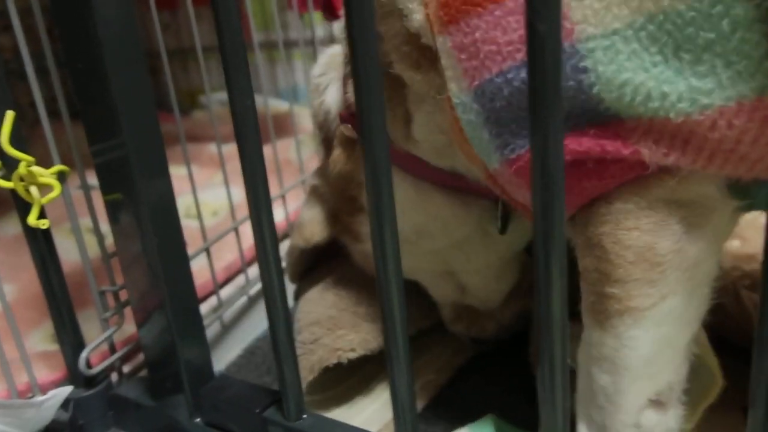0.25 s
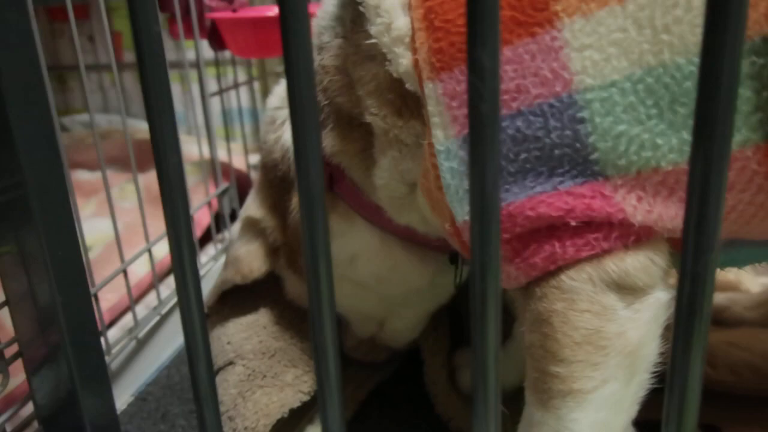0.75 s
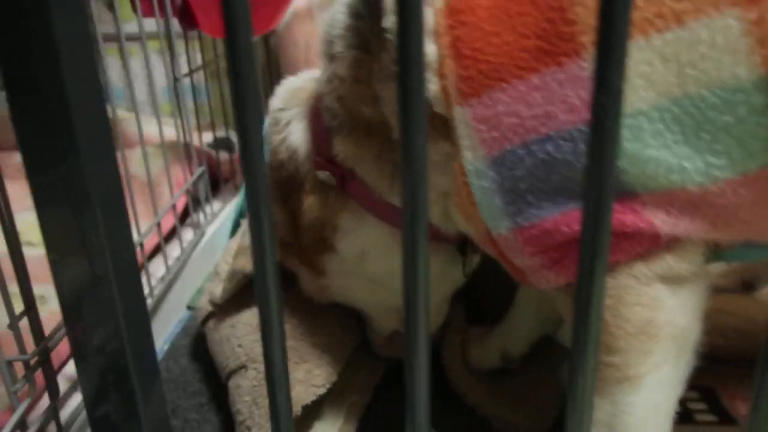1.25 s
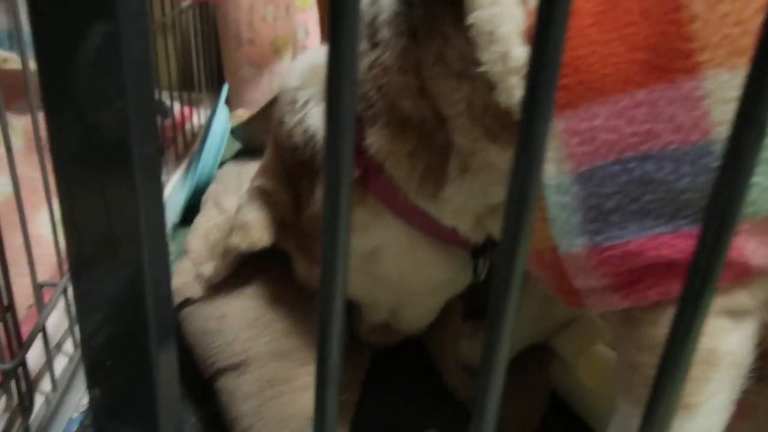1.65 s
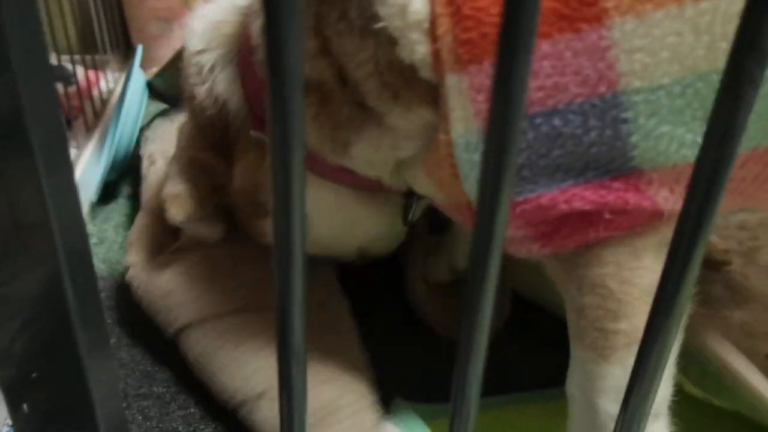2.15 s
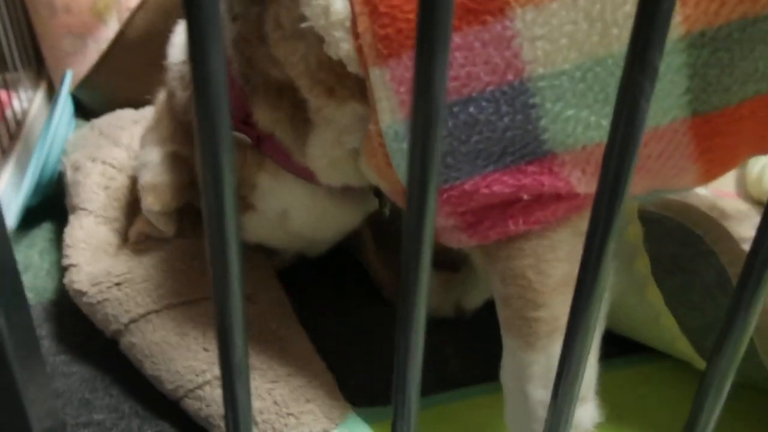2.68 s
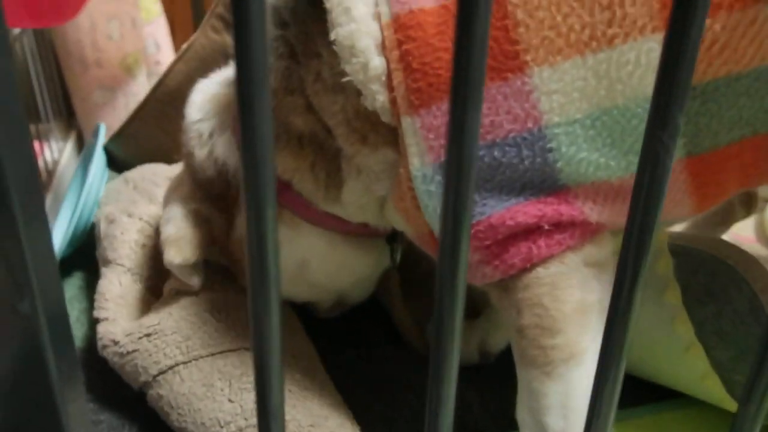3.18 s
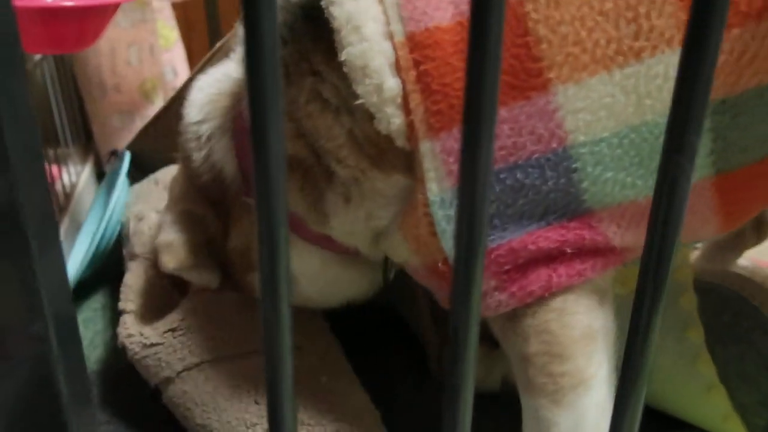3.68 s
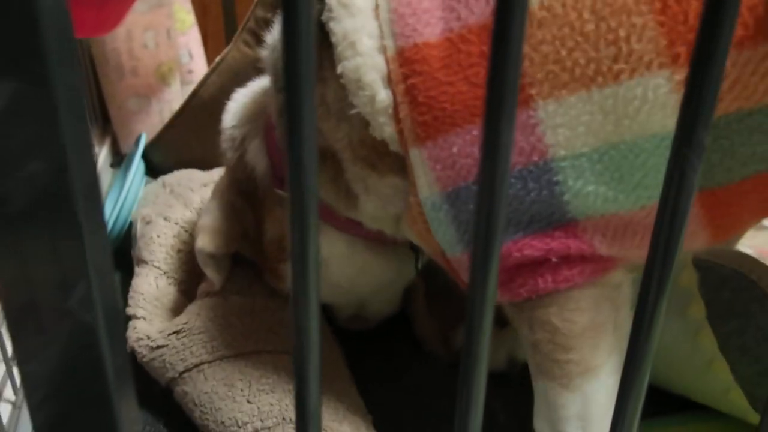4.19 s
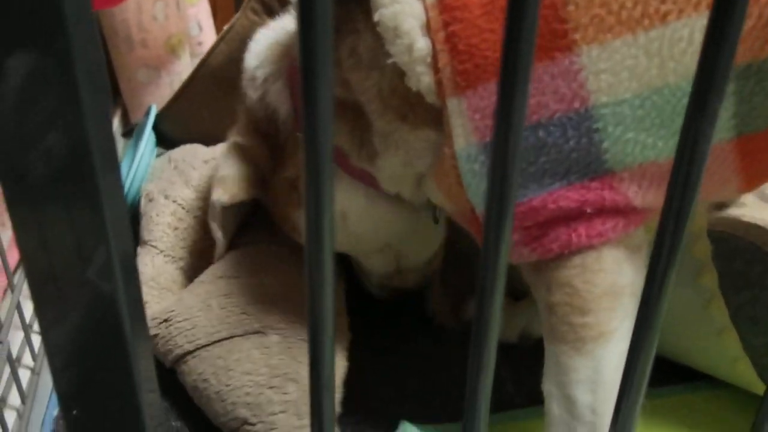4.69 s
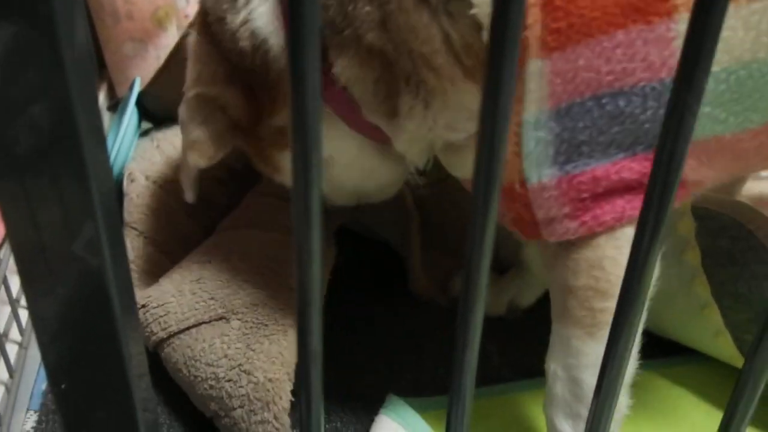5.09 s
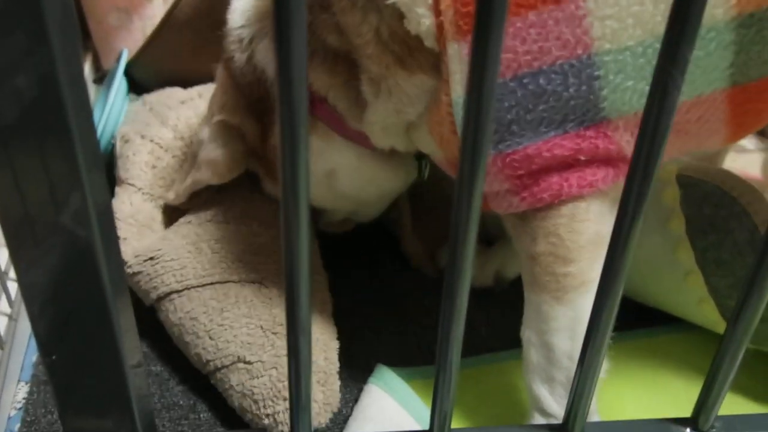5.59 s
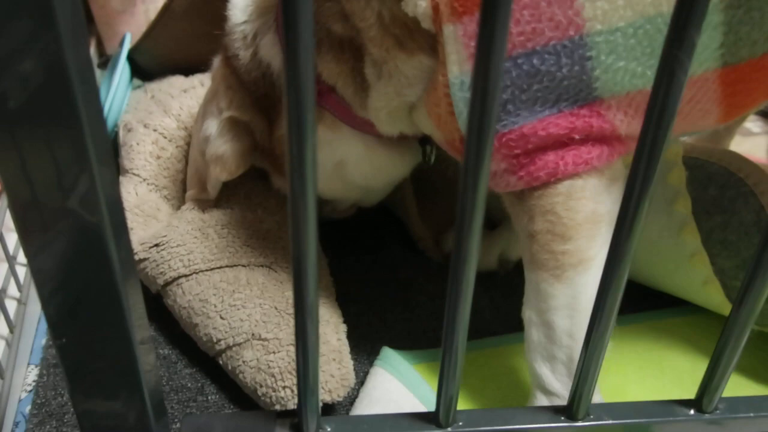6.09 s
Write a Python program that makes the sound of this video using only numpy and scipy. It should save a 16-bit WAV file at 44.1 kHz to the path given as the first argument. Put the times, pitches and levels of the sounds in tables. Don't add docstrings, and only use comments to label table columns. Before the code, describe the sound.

Close stereo pickup of a dog rummaging in fleece in a quiet humming room. Soft paw thuds and two snorts come first, then digging drags cloth in rough strokes while plastic creaks rapidly. A hard knock ends it; small sniffs, squeaky chirrs and ticks follow, then the biggest snort, a short groaning slide and faint scuffs.

```python
import sys
import numpy as np
from scipy import signal
from scipy.fft import rfft, irfft, next_fast_len
from scipy.io import wavfile

SR = 44100
rng = np.random.default_rng(int(sys.argv[2]) if len(sys.argv) > 2 else 0)


def int16_out(signal):
    q = np.round(np.clip(np.atleast_2d(signal).T, -1, 1) * 32767)
    wavfile.write(sys.argv[1], SR, q.astype(np.int16))


def boost(x):
    u = np.asarray(x, float) / 20
    return 10 ** u


N = 279798


def in_time(rows):
    s, *columns = np.transpose(rows)
    return [np.interp(np.arange(N) / SR, s, column) for column in columns]


def rms_one(x):
    return x / np.sqrt(np.mean(x ** 2) + 1e-20)


def mid_only(x):
    return np.array([x, np.zeros(N)])


def low_pass(x, order, hz):
    return signal.sosfilt(signal.butter(order, hz, fs=SR, output="sos"), x)


def coloured(spectrum):
    hz, db = np.transpose(spectrum)
    size = next_fast_len(N)
    bins_hz = np.arange(size // 2 + 1) * SR / size + 1
    gain = boost(np.interp(np.log(bins_hz), np.log(hz), db))
    return rms_one(irfft(rfft(rng.standard_normal(size)) * gain, size)[:N])


def drift(rate_hz):
    return coloured([(rate_hz / 10, 0), (rate_hz, 0), (rate_hz * 10, -40), (SR, -160)])


def resonance(x, hz, width_hz):
    r = np.exp(-np.pi * width_hz / SR)
    poles = [1, -2 * r * np.cos(2 * np.pi * hz / SR), r * r]
    return signal.lfilter([(1 - r * r) / 2, 0, (r * r - 1) / 2], poles, x + 1e-18)


def narrow(x, hz, width_hz):
    return resonance(resonance(x, hz, width_hz), hz, width_hz)


def band(hz, width_hz):
    return rms_one(narrow(rng.standard_normal(N), hz, width_hz))


def ring(clicks, hz, t60):
    r, w = boost(-60 / (t60 * SR)), 2 * np.pi * hz / SR
    return signal.lfilter([0, np.sin(w)], [1, -2 * r * np.cos(w), r * r], clicks + 1e-18)


def leaning(hz, k):
    return 1 if hz < 1500 else (-1) ** k


def strike(events, modes, bright_hz, scatter_db, smear_s):
    s, peak_db, bright_db, apart_db = np.transpose(events)
    out = np.zeros((2, N))
    luck = rng.random((len(s), len(modes), 3))
    for k, (hz, t60, mid_db, side_db) in enumerate(modes):
        late, strength, sign = luck[:, k].T
        db = peak_db + scatter_db * (2 * strength - 1) + bright_db * (hz > bright_hz)
        shares = boost(np.array([mid_db + 0 * s, side_db + apart_db])) * [[1], [leaning(hz, k)]]
        clicks = np.zeros((2, N))
        clicks[:, ((s + smear_s * late) * SR).astype(int)] = boost(db) * np.sign(sign - 0.5) * shares
        out += resonance(ring(clicks, hz, t60), hz, 40 / t60)
    return out


def swells(rows, curve):
    out = np.full(N, 1e-9)
    for peak, rise, fall, db in rows:
        i = np.arange(max(int((peak - 2 * rise) * SR), 0), min(int((peak + 2 * fall) * SR), N))
        away = i / SR - peak
        distance = np.where(away < 0, -away / rise, away / fall)
        out[i] += boost(db - 30 * distance ** curve)
    return out


# freq_hz, density_db (per Hz)
FLOOR_MID = [(44, -27), (75, -9), (92, -14.5), (123, -6.5), (273, -39), (667, -23), (798, -8.5), (872, -29),
             (954, -24), (1090, -29), (1270, -28), (7940, -47), (15500, -60)]
FLOOR_SIDE = [(35, -54), (60, -25), (132, -6.5), (443, -6.5), (738, -15), (810, -11), (2010, -15.5),
              (3840, -21), (12300, -35), (15500, -45)]
# freq_hz, level_db
HUM = [(60, -40.5), (120, -59.5)]
# freq_hz, width_hz, level_db
FAN = [(54.3, 31, -54), (799.3, 22.7, -56)]


def room():
    t = np.arange(N) / SR
    mid = boost(-50) * coloured(FLOOR_MID)
    for hz, db in HUM:
        mid += boost(db + 0.67 * drift(0.64)) * np.sqrt(2) * np.sin(2 * np.pi * hz * t)
    for hz, width, db in FAN:
        mid += boost(db + 2.5 * drift(3.7)) * band(hz, width)
    return np.array([mid, boost(-52.5) * coloured(FLOOR_SIDE)])


# time_s, rumble_db
STIR = [(0.0, -47), (0.48, -57.5), (1.06, -44), (1.39, -54), (1.84, -45), (2.45, -51), (2.67, -43),
        (2.9, -68), (3.14, -68), (3.3, -57), (4.04, -47.5), (4.6, -49.5), (4.91, -56), (5.26, -50.5),
        (5.42, -41), (5.6, -58), (6.0, -56.5), (6.34, -48.5)]


def stir():
    rumble_db, = in_time(STIR)
    return mid_only(boost(rumble_db - 0.5 + 2.8 * drift(5.8)) * band(154.6, 55))


# peak_s, rise_and_fall_s, level_db
SCUFFS = [(0.5, 0.46, -53), (0.74, 0.35, -41), (1.3, 0.53, -48.5), (1.65, 0.4, -56), (1.84, 0.75, -46),
          (2.5, 0.31, -49.5), (2.679, 0.23, -37), (3.0, 0.31, -42.5), (3.3, 0.54, -55), (3.74, 1, -54.5),
          (4.55, 0.36, -45.5), (4.88, 0.043, -53), (5.14, 0.22, -51), (5.5, 0.79, -61), (6.2, 0.32, -55)]


def scuffs():
    level = boost(-57.5) + swells([(s, half, half, db) for s, half, db in SCUFFS], 0.67)
    return mid_only(level * boost(1.5 * drift(21)) * band(278, 422))


# start_s, peak_db, brightness_db
TICKS = [(0.167, -46, -10.5), (0.642, -40, -17), (0.702, -42, -13), (0.786, -39.5, 0.5), (0.937, -39.5, -9),
         (0.9693, -48, -6.5), (1.039, -41, -10.5), (1.101, -46.5, -5), (1.937, -32, -12.5),
         (2.4307, -34.5, -9), (2.967, -48, -12), (3.8378, -42, -15), (3.908, -45.5, -15),
         (3.9712, -38.5, -16), (4.141, -44, -16), (4.239, -43, -13), (4.341, -39, -13),
         (5.1339, -35.5, -11), (5.2066, -50, -17), (5.405, -45.5, -7), (5.5391, -39, -13),
         (6.137, -40.5, -18), (6.336, -47, -15)]
# freq_hz, t60_s, mid_db, side_db
TICK_MODES = [(2370, 0.018, 3.5, -5.5), (3180, 0.0085, 10, 4), (3900, 0.0032, 14.5, 14),
              (5060, 0.011, 2, 10), (6020, 0.0075, 2, -11), (7450, 0.0049, -21, -1),
              (11000, 0.0091, -3, -15)]


def ticks():
    return strike([(*tick, 0) for tick in TICKS], TICK_MODES, bright_hz=2900, scatter_db=4.5, smear_s=0.003)


# start_s, peak_db
SNAPS = [
    (3.293, -44.5),
    (4.756, -60),
    (4.97, -55),
]
# freq_hz, t60_s, mid_db, side_db
SNAP_MODES = [(6000, 0.004, -7, -12), (10300, 0.0041, 1.5, -5), (12100, 0.004, 0, -4),
              (14500, 0.004, -8, -3)]


def snaps():
    return strike([(*snap, 0, 0) for snap in SNAPS], SNAP_MODES, bright_hz=SR, scatter_db=6, smear_s=0.0015)


# start_s, peak_db, length_s, side_db
CHIRRS = [(0.71, -42, 0.012, -3), (0.868, -52.5, 0.017, 6), (0.902, -48, 0.016, 1),
          (1.1097, -39.5, 0.011, -3), (3.01, -43, 0.0098, -3), (3.056, -51, 0.014, -5),
          (3.132, -50, 0.03, -11), (3.083, -58, 0.03, -8), (3.161, -57, 0.025, -8), (3.232, -57, 0.045, -5),
          (3.7421, -42, 0.015, 0), (3.752, -40, 0.015, 2), (3.846, -45.5, 0.011, 0), (3.98, -42, 0.0079, 0),
          (3.9883, -42, 0.011, 3), (4.17, -51, 0.02, -14), (4.258, -57, 0.014, -8),
          (5.413, -42.5, 0.0094, -1), (5.547, -44.5, 0.0096, 2), (6.174, -50, 0.015, 1)]
# freq_hz, width_hz, level_db
CHIRR_MODES = [(1775, 142, 8.5), (2490, 260, -2.5), (3440, 540, -11.5), (4280, 200, -17)]


def chirrs():
    slips = np.zeros((2, N))
    for s, peak_db, length, side_db in CHIRRS:
        length = max(length, 0.004)
        u = np.arange(int(length * SR)) / (length * SR)
        burst = np.sqrt(1 - u) * rng.standard_normal((2, len(u))) * [[1], [boost(side_db)]]
        slips[:, int(s * SR):int(s * SR) + len(u)] += boost(peak_db + 16.5) * burst
    return sum(boost(db - 1.5) * narrow(slips, hz, 1.13 * width) for hz, width, db in CHIRR_MODES)


# start_s, length_s, level_db, from_hz, to_hz
SLIDES = [
    (4.855, 0.065, -42, 620, 298.5),
]


def slides():
    out = np.zeros(N)
    for s, length, db, from_hz, to_hz in SLIDES:
        u = np.arange(int(length * SR)) / (length * SR)
        rough = drift(60)[:len(u)]
        hz = from_hz * (to_hz / from_hz) ** u * (1 + 0.068 * rough)
        tone = np.sin(2 * np.pi * np.cumsum(hz) / SR)
        out[int(s * SR):int(s * SR) + len(u)] += boost(db + 2.9 * rough) * np.sin(np.pi * u) * tone
    return mid_only(out)


# start_s, peak_db, brightness_db, side_share_db
CREAKS = [(0.787, -29, -34, -4), (1.535, -31, -12.5, 5), (1.545, -34, -27, 6), (1.731, -39, -9, 9),
          (1.7444, -39, -3, 2), (1.7489, -15.5, -9.5, 5.5), (1.7595, -35, -20, 5), (1.767, -47, -10, 3),
          (1.772, -38, -8, 3), (1.7775, -20.5, -15, 5), (1.786, -38, -14, 3), (1.809, -40, -10, 6),
          (1.816, -45, -3, 3), (1.829, -24, -16.5, 5.5), (1.858, -36, -13, 2), (1.889, -27.5, -17, 2),
          (1.955, -33, -20, -6), (1.973, -30.5, -17.5, 5), (2.101, -39, -12, -4), (2.1235, -19.5, -15, 4),
          (2.135, -18, -19, -1), (2.148, -18.5, -16, 4), (2.194, -34.5, -8, -1), (2.203, -23.5, -12.5, 3),
          (2.213, -33, -6, 2), (2.231, -23, -12.5, 0), (2.256, -22, -15, 6), (2.266, -29, -18, 3),
          (2.275, -33, -13, 10), (2.281, -15.5, -15.5, 0), (2.289, -38, -16, 2), (2.3008, -14.5, -17.5, 6),
          (2.3142, -15.5, -13.5, 13), (2.32, -13.5, -11, -2), (2.3276, -16, -21, 10), (2.335, -23, -13, -3),
          (2.342, -17, -13, -6), (2.350, -26, -8.5, 7), (2.467, -35, -5.5, 3), (2.494, -44, -9, 7)]
# freq_hz, t60_s, mid_db, side_db
CASING_MODES = [(444, 0.04, -0.5, -14), (740, 0.095, -9.5, -29), (1100, 0.025, 0, -8),
                (1380, 0.0056, -25, 17.5), (1800, 0.026, 6, -1), (2450, 0.011, 5.5, -6),
                (3260, 0.0028, 2.5, 17), (4480, 0.012, -12, -5), (5350, 0.018, -16, -21),
                (6840, 0.006, 1.5, -15), (7600, 0.0045, -40, -7), (10800, 0.0044, -8, -8),
                (11760, 0.022, -13.5, -15), (13900, 0.0034, -31, -14)]


def creaks():
    return strike(CREAKS, CASING_MODES, bright_hz=1300, scatter_db=-0.5, smear_s=0.0008)


def creep_db():
    marks = np.zeros(N)
    marks[[int(s * SR) for s, *rest in CREAKS]] = 1
    half_s = 0.0053
    bumps = signal.fftconvolve(marks, np.hanning(int(2 * half_s * SR)), "same")
    return 4 * np.minimum(bumps, 1)


# peak_s, rise_s, fall_s, level_db, paw_weight_db (over the level)
DRAG = [(0.09, 0.32, 0.17, -59, 8.5), (0.615, 0.026, 0.12, -51.5, -2), (0.72, 0.083, 0.18, -62.5, -2),
        (0.85, 0.14, 0.73, -67.5, 13), (0.98, 0.35, 0.16, -69, 7.5), (1.55, 0.13, 0.027, -59, 7),
        (1.71, 0.27, 0.11, -64.5, 1), (1.769, 0.087, 0.083, -49.5, 6), (1.87, 0.16, 0.22, -58, -3),
        (1.98, 0.17, 0.19, -62, 8), (2.147, 0.077, 0.033, -45.5, 7), (2.209, 0.045, 0.2, -54.5, 14),
        (2.336, 0.15, 0.042, -48, 11.5), (2.4, 0.19, 0.12, -56.5, 6.5), (2.5, 0.1, 0.17, -50, 0.5),
        (2.67, 0.35, 0.18, -45.5, 1.5), (2.767, 0.21, 0.049, -47.5, 11.5), (2.904, 0.0066, 0.036, -50, 12),
        (3.01, 0.064, 0.055, -54.5, 2.5), (3.05, 0.026, 0.025, -61, 7), (3.15, 0.092, 0.077, -56.5, 2.5),
        (3.275, 0.078, 0.049, -61.5, -5), (3.752, 0.047, 0.12, -60, 6.5), (3.83, 0.13, 0.14, -65, 10),
        (4.17, 0.19, 0.19, -60.5, 7), (4.35, 0.16, 0.09, -59.5, -2)]
# freq_hz, width_hz, mid_db, side_db
CLOTH = [(418, 92, -1.5, 0.5), (677, 310, 2, -7), (816, 180, -6.5, -6), (1260, 244, 0.5, -5.5),
         (1635, 306, -0.5, 6), (2330, 670, -8, 3.5), (2780, 580, 1.5, -29), (3400, 810, -84, 6.5),
         (3970, 1500, 0.5, -13), (5360, 4000, -2.5, -0.5), (6900, 1000, -8, -13), (8650, 1400, -5, -9),
         (10600, 460, -51, -17), (12300, 1100, -46, -4), (13600, 1800, -38, -29)]
# time_s, side_share_db, brightness_db
GRIP = [(0, -13, -1), (0.8, 0.5, -7), (1.75, 1.5, 0.5), (2.0, 0, -7), (2.3, 3.5, 6), (2.6, -4, -1.5),
        (3.0, 0, -4), (3.05, 5, 2.5), (3.12, 0.1, -13), (3.28, -1, -5), (3.8, -15, 1.5), (4.3, -12, -12)]


def drag():
    curve = 1.2
    level = swells([row[:4] for row in DRAG], curve)
    weight = swells([(s, rise, fall, db + over_db) for s, rise, fall, db, over_db in DRAG], curve)
    side, bright = boost(np.array(in_time(GRIP)))
    caught = rng.random(N) < 8000 * boost(1.5 * drift(70)) / SR
    strength = boost(2.94 * np.minimum(rng.exponential(1, N), 4))
    catches = caught * strength * rng.choice([-1, 1], N)
    slide = np.cumsum(1 + 0.038 * drift(5))
    out = np.zeros((2, N))
    for k, (hz, width, mid_db, side_db) in enumerate(CLOTH):
        rubbed = narrow(catches, hz, width)
        high = level
        if hz > 2300:
            rubbed = np.interp(slide * (N - 1) / slide[-1], np.arange(N), rubbed)
            high = level * bright
        rubbed = rms_one(rubbed) * boost(2 * drift(16.7))
        out[0] += rubbed * boost(mid_db) * (weight if hz < 1000 else high)
        out[1] += rubbed * boost(side_db) * side * high * leaning(hz, k)
    out[0] = low_pass(out[0], 4, 7700) + boost(-9.5) * out[0]
    return out * boost(creep_db() + np.clip(0.53 * drift(60), -3, 3))


# start_s, peak_db, pitch_hz, t60_s, crack_db
THUDS = [(0.026, -23, 304, 0.031, -23), (0.04, -20.5, 325, 0.013, -41), (0.087, -17.5, 178, 0.023, -35),
         (0.452, -29, 750, 0.019, -27), (0.646, -24.5, 772, 0.06, -23), (0.655, -27.5, 804, 0.05, -15),
         (0.793, -30, 440, 0.034, -30), (1.431, -21.5, 371, 0.057, -30), (1.449, -27, 595, 0.086, -11.5),
         (2.6, -26.5, 628, 0.12, -18), (2.671, -34, 623, 0.067, -12), (2.713, -25, 640, 0.047, -10),
         (2.754, -22.5, 649, 0.048, -25), (2.9016, -13, 381, 0.024, -3.5), (3.2395, -21, 610, 0.015, -20),
         (4.0305, -19.5, 356, 0.03, -36), (4.15, -22.5, 1590, 0.016, -14), (4.049, -29, 550, 0.1, -32)]
# freq_hz, t60_s, mid_db, side_db
KNOCK_MODES = [(620, 0.036, -17.5, -14), (830, 0.034, -9.5, -17), (950, 0.011, -4, -12),
               (1280, 0.026, -5, -6), (1735, 0.026, -0.5, -14), (2360, 0.023, -23, -10),
               (3440, 0.0036, -3, -12), (4300, 0.0018, -7.5, -3)]


def thuds():
    cracks = [(s, db, crack_db, 0) for s, db, hz, t60, crack_db in THUDS]
    out = strike(cracks, KNOCK_MODES, bright_hz=500, scatter_db=1.5, smear_s=0.0011)
    for s, db, hz, t60, crack_db in THUDS:
        click = np.zeros(SR // 5)
        click[0] = -boost(db)
        body = ring(click, hz, t60)
        body += 0.15 * ring(click, 1.8 * hz, 0.76 * t60)
        body += 1.54 * ring(click, 0.5 * hz, 0.5 * t60)
        soft = resonance(body, hz, 1.22 * hz)
        out[:, int(s * SR):int(s * SR) + len(body)] += soft * [[1], [boost(-23)]]
    return low_pass(out, 5, 4700)


# peak_s, rise_s, fall_s, nose_db, whistle_db (over the nose)
SNORTS = [(0.645, 0.13, 0.13, -38.5, -42), (1.458, 0.067, 0.065, -33, -27),
          (3.006, 0.0097, 0.11, -43.5, -10.5), (3.241, 0.014, 0.12, -44, -24),
          (3.809, 0.045, 0.032, -45, -30), (4.031, 0.052, 0.14, -37, -37), (4.081, 0.045, 0.05, -44, -30),
          (4.52, 0.077, 0.18, -38, -14), (4.628, 0.15, 0.097, -26, -12.5), (4.751, 0.065, 0.06, -50.5, -17),
          (4.89, 0.21, 0.051, -56, -4.5), (4.966, 0.044, 0.042, -54, -14)]
SNORT_CURVE = 1.55


def following(base_db, follows, lag_s):
    rows = [(s + lag_s, rise, fall, base_db + follows * (db + 35)) for s, rise, fall, db, _ in SNORTS]
    return swells(rows, SNORT_CURVE)


# freq_hz, width_hz, level_db
NOSE = [(646, 300, 28), (700, 180, 20), (861, 53, -4.5), (1420, 53, -5), (1800, 150, -22)]
# freq_hz, density_db
HISS_MID = [(650, -54), (1100, -9.5), (2160, -14.5), (6540, -21), (7600, -32), (11000, -35.5), (15500, -42)]
HISS_SIDE = [(2650, -36), (4500, -7), (8030, -11), (10300, -13), (12600, -15), (15500, -26)]


def snorts():
    flow = swells([row[:4] for row in SNORTS], SNORT_CURVE)
    air = rng.standard_normal(N)
    nose = rms_one(sum(boost(db) * narrow(air, hz, width) for hz, width, db in NOSE))
    muzzle = following(-42, 0.44, -0.0035) * rms_one(narrow(air, 397, 172))
    flutter_db = 1.5 * np.cos(2 * np.pi * 60.8 * (np.arange(N) / SR - 4.633))
    nose = (flow * nose + muzzle) * boost(1.5 * drift(29) + flutter_db)
    hiss = following(-49, 0.91, 0.0037) * boost(1.9 * drift(34))
    narrowing = swells([(s + 0.01, 1.1 * rise, 0.63 * fall, db + over_db)
                        for s, rise, fall, db, over_db in SNORTS], SNORT_CURVE)
    pitch_lag_s = 0.052
    effort_db = np.clip(20 * np.log10(np.roll(flow, int(pitch_lag_s * SR))), -50, 0) + 35
    whistle_hz = 9400 + 69 * effort_db
    whistle = boost(-4) * narrowing * drift(1040) * np.cos(2 * np.pi * np.cumsum(whistle_hz) / SR)
    mid = nose + hiss * coloured(HISS_MID) + whistle
    side = boost(-57) * nose + boost(-8.5) * hiss * coloured(HISS_SIDE) + boost(-30) * whistle
    return np.array([mid, side])


def scene():
    background = room() + stir() + scuffs()
    details = ticks() + snaps() + chirrs() + slides()
    casing = low_pass(creaks() + drag(), 6, 14300)
    mid, side = background + details + casing + thuds() + snorts()
    side = signal.sosfilt(signal.butter(2, 130, "high", fs=SR, output="sos"), side)
    return np.array([mid + side, mid - side])


def top_cut(x):
    return signal.sosfilt(signal.butter(12, 15730, fs=SR, output="sos"), x)


def record(dry):
    rounded = np.tanh(dry)
    return top_cut(rounded)


dry = scene()
out = record(dry)
int16_out(out)
```